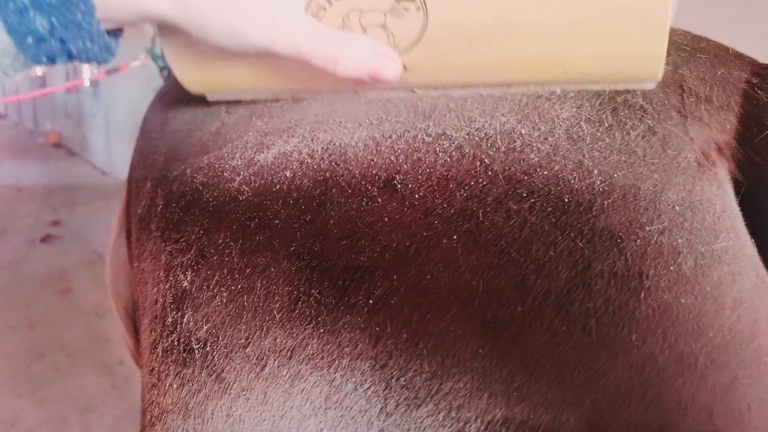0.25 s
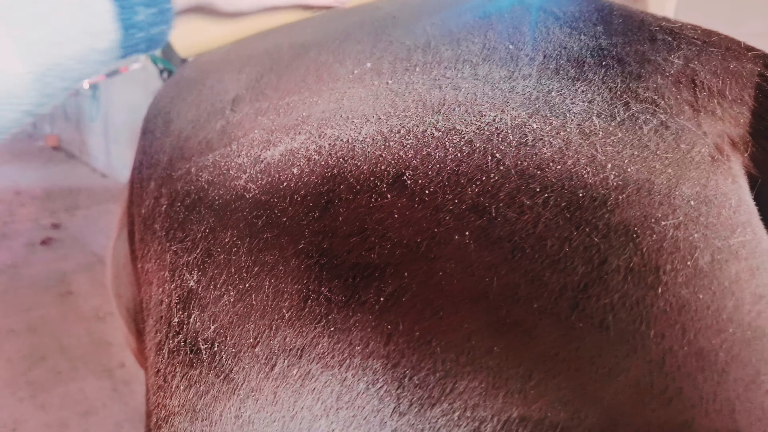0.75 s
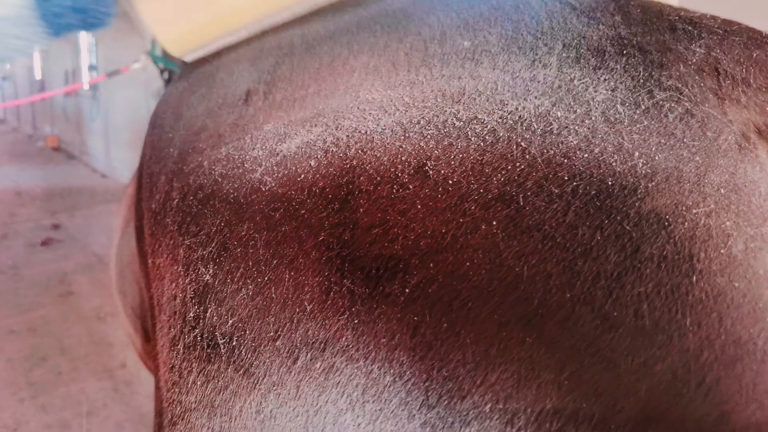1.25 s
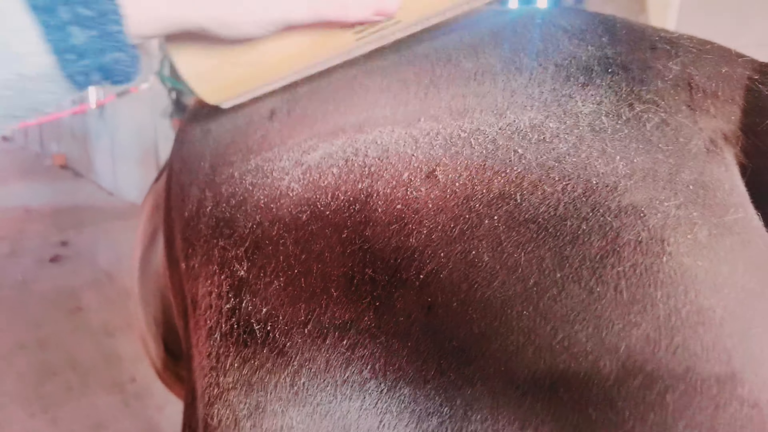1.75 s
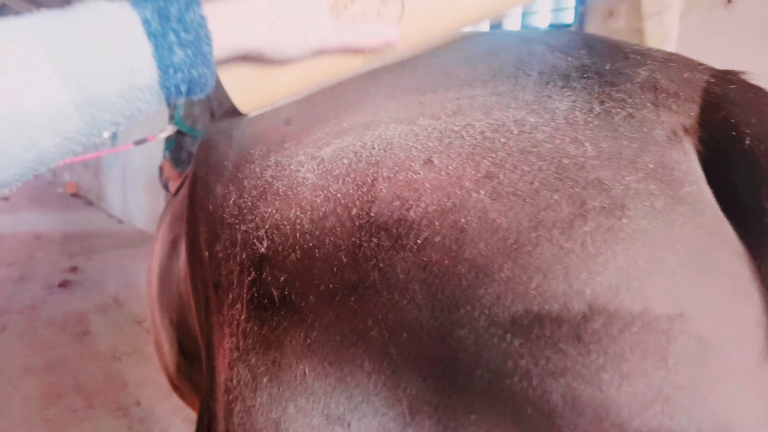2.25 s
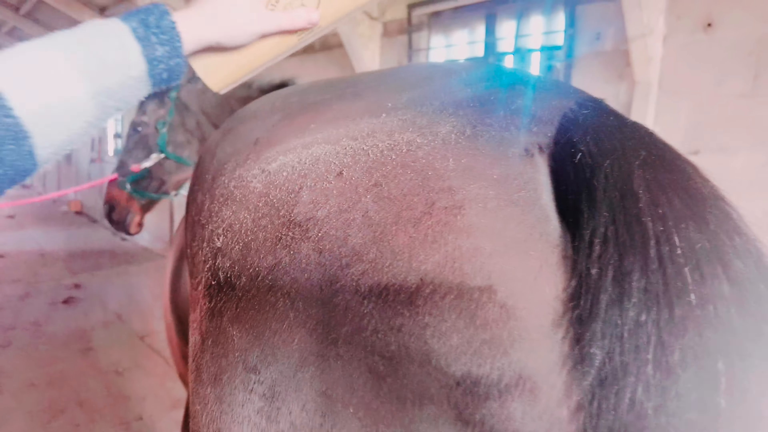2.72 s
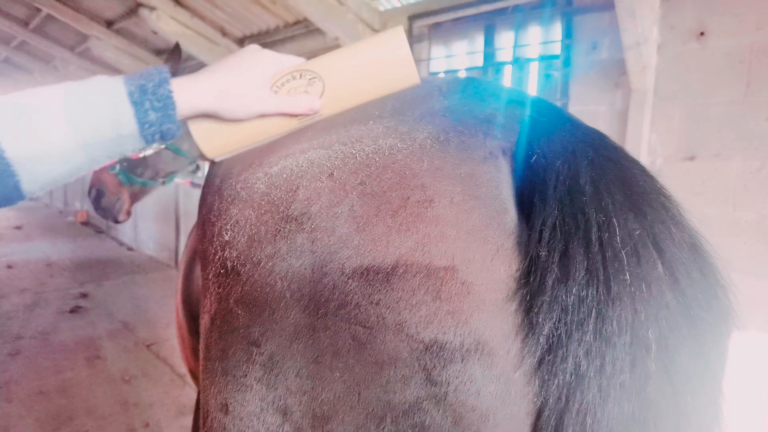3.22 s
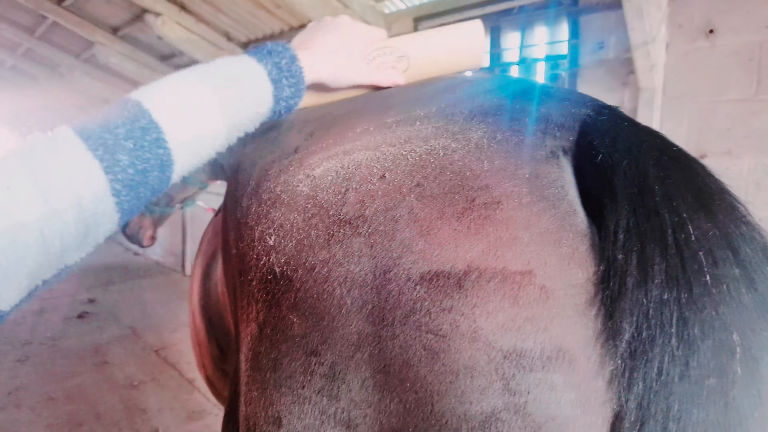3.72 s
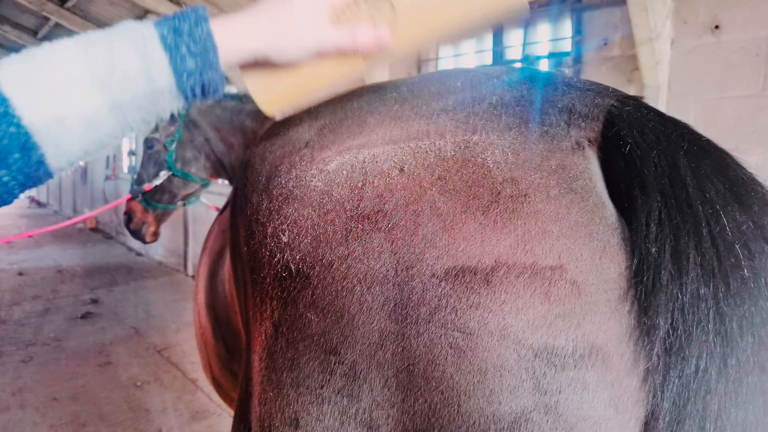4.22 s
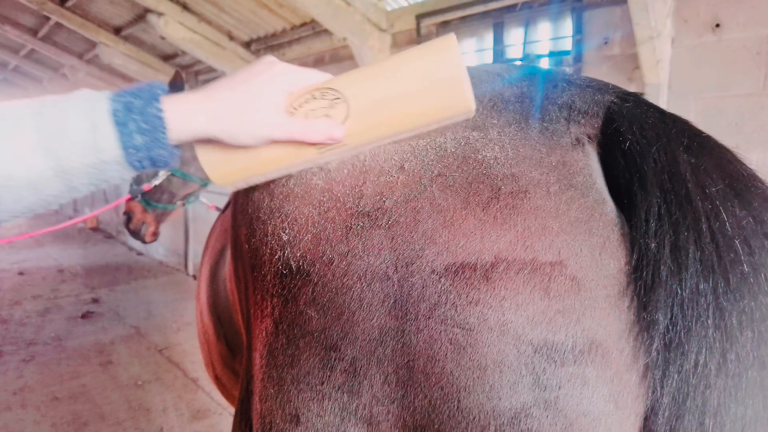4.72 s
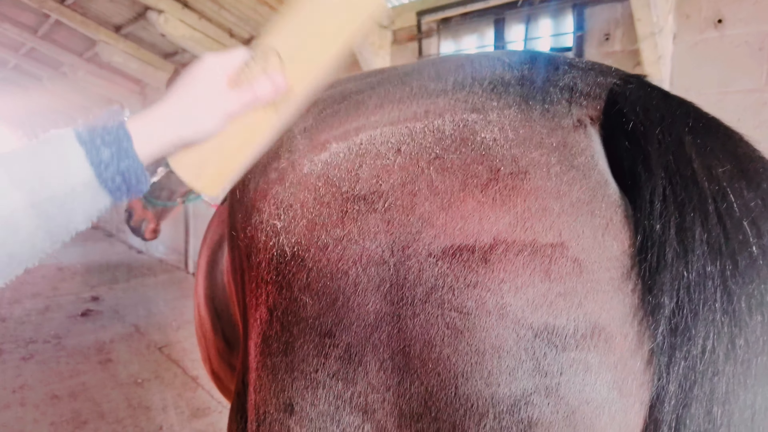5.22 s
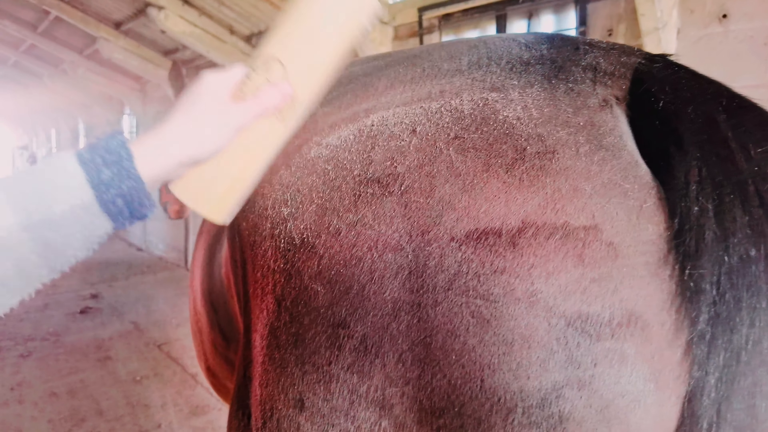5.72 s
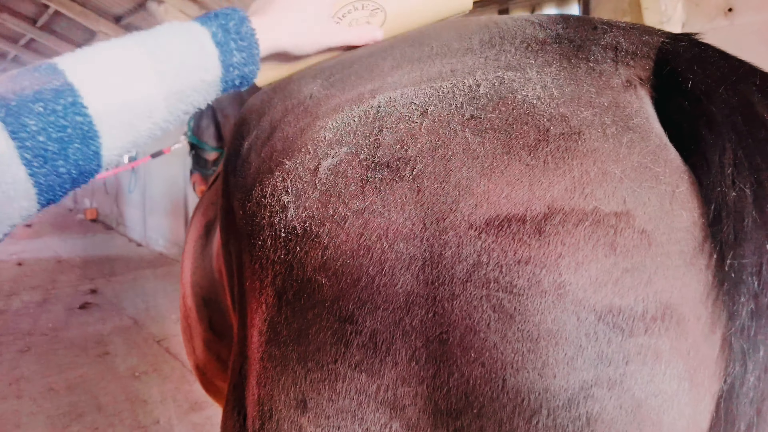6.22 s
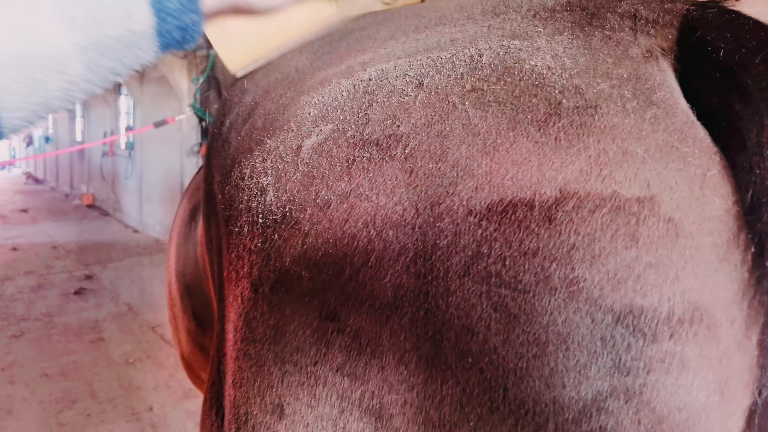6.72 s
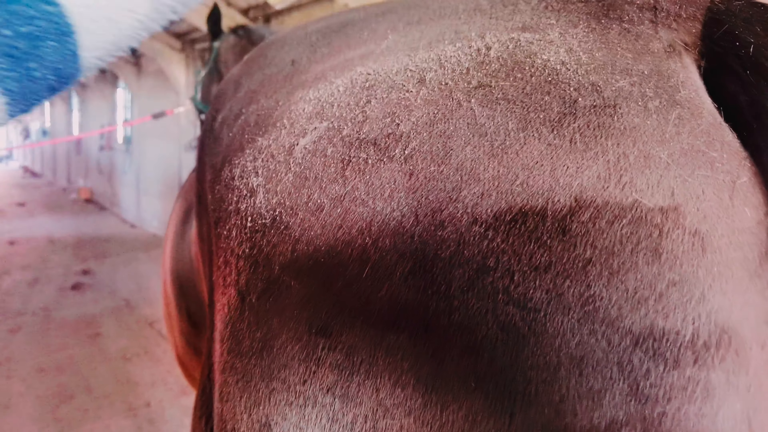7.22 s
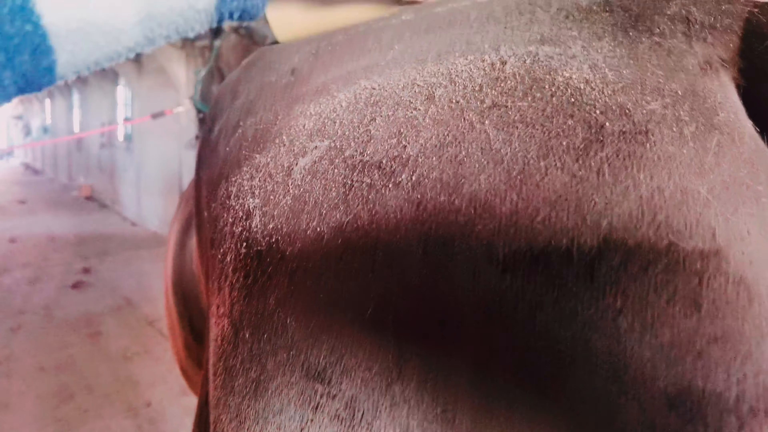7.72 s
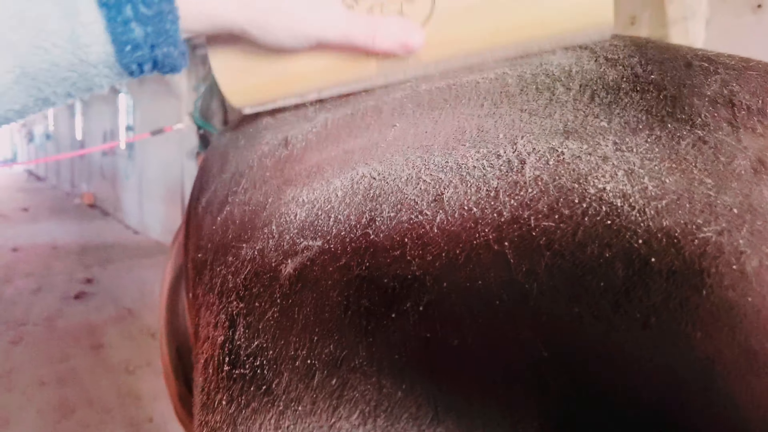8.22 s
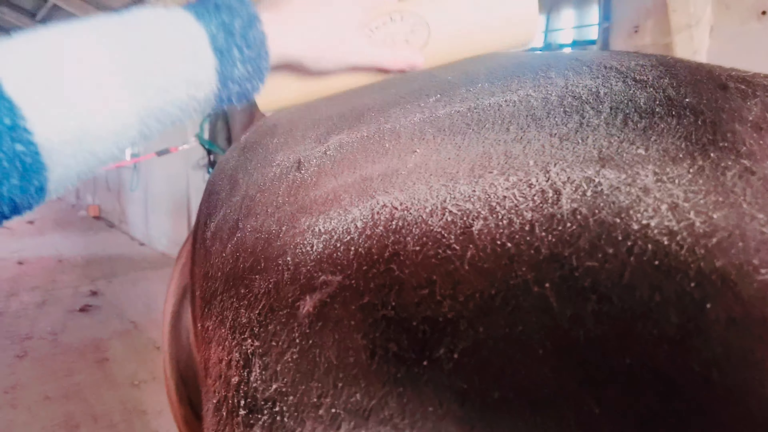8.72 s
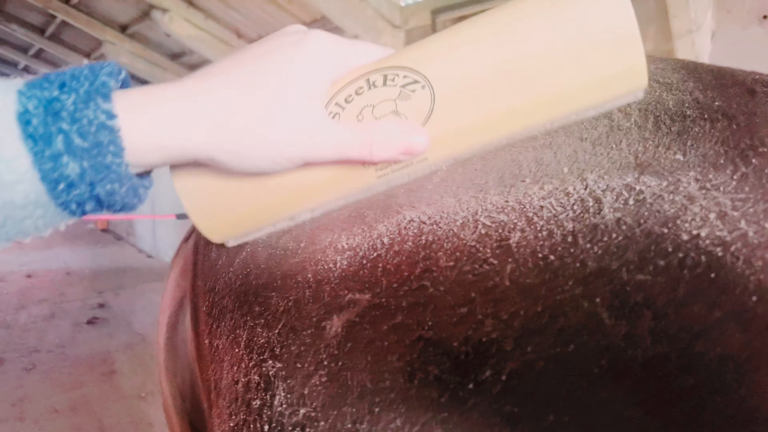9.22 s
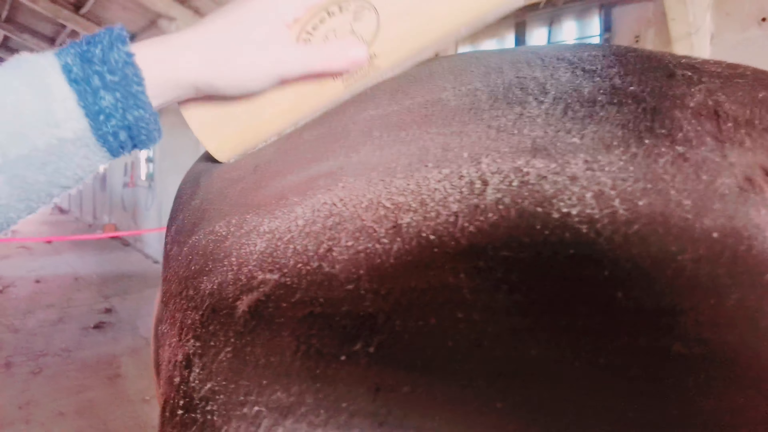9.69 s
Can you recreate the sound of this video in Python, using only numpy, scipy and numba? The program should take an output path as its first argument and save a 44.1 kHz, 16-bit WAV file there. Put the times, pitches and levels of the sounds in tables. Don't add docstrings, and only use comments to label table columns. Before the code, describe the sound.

Quick dry scrapes of a serrated grooming tool through short hair, bright and crackly, repeat unevenly over quiet wind rumble in a stable.

```python
import sys
import numpy as np
from scipy import signal
from scipy.fft import rfft, irfft, next_fast_len
from scipy.io import wavfile
from scipy.ndimage import uniform_filter1d
from numba import njit

SR = 44100
rng = np.random.default_rng(int(sys.argv[2]) if len(sys.argv) > 2 else 0)


def bounce(signal):
    frames = np.transpose(np.atleast_2d(signal))
    limited = np.clip(frames, -1, 1)
    pcm = np.round(limited * 32767).astype(np.int16)
    wavfile.write(sys.argv[1], SR, pcm)


def decibels_to_gain(level_db):
    exponent = np.asarray(level_db, float) / 20
    return 10 ** exponent


N = 438794
SIZE = next_fast_len(N)
HZ = np.arange(1, SIZE // 2 + 2) * SR / SIZE


def blade():
    # pitch_hz, level_db (per Hz)
    sum_colour = [(180, -53.5), (300, -31.5), (411, -23.5), (1420, -21), (1620, -17.5), (2150, -18.5),
                  (2490, -18.5), (3530, -10), (4520, -13), (5510, 1), (6720, -2.5), (8330, 6.5),
                  (11000, -14.5), (14400, -17), (15600, -21)]
    side_colour = [(180, -65), (300, -36.5), (675, -36), (850, -33), (987, -31.5), (2220, -18),
                   (2530, -15.5), (3710, -14), (4990, -6), (6190, -0.5), (7180, -12), (8400, -5),
                   (10200, -9.5), (11600, -23), (13000, -12), (15600, -28.5)]
    edges_hz = 1250, 2650, 4550, 6700, 10600
    delay_share = 0.05, -0.62, 0.33, .6, .3, .2
    drag, block, steel, fizz, block_hz, touch, coarse_db, thud_db = strokes()
    coarse_db = coarse_db - 5 * (1 - touch)
    tick, knock = ticks()
    hair = drag + tick
    fine = hair / np.sqrt(1 + decibels_to_gain(coarse_db) ** 2)
    coarse = fine * decibels_to_gain(coarse_db)
    hide = drag * decibels_to_gain(thud_db) + block * decibels_to_gain(-28) + 0.2 * knock
    gains = hide, block + knock, steel + 0.17 * knock, coarse, fine, fizz + tick * decibels_to_gain(-13)
    mid, loose = rfft(snaps(), SIZE)
    limits = (1, *edges_hz, SR)
    out = 0
    for lo, hi, gain, lag in zip(limits, limits[1:], gains, delay_share):
        side = (-1j * lag * mid + np.sqrt(1 - lag ** 2) * loose) * decibels_to_gain(0.5)
        part = irfft([mid * shape(sum_colour, lo, hi), side * shape(side_colour, lo, hi)], SIZE)[:, :N]
        if lo == edges_hz[0]:
            part = np.array([wood(p, block_hz, touch) for p in part])
        out = out + gain * unit(part)
    return out


def strokes():
    # land_s, speeding_up_s, slowing_until_lift_s, fastest_db, fade_by_lift_db
    stroke_table = [(-0.2, 0.097, 0.11, -29, 3.5), (0.299, 0.1, 0.068, -24.5, 5),
                    (0.765, 0.057, 0.081, -24, 8), (1.373, 0.19, 0.074, -22, 9.5),
                    (1.907, 0.11, 0.08, -23.5, 8), (2.592, 0.23, 0.11, -24, 10.5),
                    (3.23, 0.13, 0.1, -25.5, 9), (3.783, 0.065, 0.067, -23.5, 9.5),
                    (4.198, 0.025, 0.12, -28, 5), (4.88, 0.13, 0.18, -28.5, 6.5),
                    (5.652, 0.18, 0.15, -24.5, 10), (6.395, 0.12, 0.087, -28.5, 9.5),
                    (6.874, 0.053, 0.059, -34, 5.1), (7.316, 0.057, 0.052, -30.5, 11.5),
                    (7.656, 0.031, 0.045, -40.5, 11.5), (8.13, 0.23, 0.087, -26.5, 3),
                    (8.735, 0.04, 0.097, -23.5, 5.5), (9.324, 0.095, 0.035, -22, 7),
                    (9.691, 0.036, 0.056, -22.5, 9)]
    # softer_at_landing_db, block_share_db, blade_share_db, fizz_share_db,
    # coarse_over_fine_hair_db
    grip_table = [(6.0, -22, -19.5, -20, 0), (4.5, -23.5, -15, -17, 2.8), (5.5, -22.5, -13, -17, 0.7),
                  (5.5, -24, -10, -18.8, -3.5), (9.5, -19.5, -8.5, -16, -1.7), (10, -25, -15, -17, -1),
                  (18.5, -18.5, -12, -15, -4), (18, -20, -13.5, -17.5, -5.5),
                  (7.5, -18.5, -11, -16.5, -2.3), (7, -22.5, -15.5, -20, -2), (6, -18, -7, -17.5, -6),
                  (9, -18.5, -14, -17, -4), (8, -18, -17, -16, -7), (6, -25.5, -18.5, -19, -2),
                  (1.5, -24, -16, -15, -8), (18.5, -24, -13.5, -20.5, -1), (11.7, -21.5, -13.5, -17, -1),
                  (2.5, -22, -12.5, -19.5, -1), (5.5, -19.5, -10, -16.5, -3.5)]
    # landing_speed, lifting_speed (1 = usual), presses_harder_by_end_db
    hand_table = [(1.01, 0.95, 1.5), (1.01, 0.99, 2.5), (1, 1.3, 0), (1.3, 1.01, 2), (1, 1.1, -4),
                  (1.06, 1.01, 1.2), (1.4, 0.99, 0.5), (0.79, 1.1, -1.5), (1.1, 1.12, -2), (1, 0.99, 2),
                  (1.01, 0.86, -0.2), (.9, 0.71, 0.5), (0.67, 1.01, 3.5), (0.7, 0.8, 3), (1.2, 0.82, 4),
                  (1.1, 1.07, -1), (1.2, 1.02, -1), (1.28, 1, 3), (0.98, 1.05, -1)]
    # ring_at_landing_hz, hide_thud_db
    seat_table = [(2000, -28.5), (1996, -26.5), (2020, -27), (2150, -29), (2170, -29), (1980, -27),
                  (1870, -30.5), (2060, -37), (1990, -28.5), (2003, -28.5), (2065, -30.5), (1980, -28),
                  (1710, -33), (1746, -30.5), (1706, -29), (1890, -26.5), (1900, -28), (2050, -35.5),
                  (2150, -30)]
    # middle_s, length_s, hair_db, block_share_db
    brush_table = [(0.553, 0.095, -46, -7.5), (0.711, 0.017, -51.5, -18), (1.282, 0.033, -63, -9),
                   (1.837, 0.043, -60.5, -21.3), (2.512, 0.13, -63.5, -9), (3.193, 0.12, -56.2, -3.5),
                   (3.723, 0.27, -55.5, -13), (4.143, 0.015, -54, -28), (4.577, 0.19, -59, -3),
                   (4.762, 0.15, -62.5, -8), (5.572, 0.069, -54.7, -26), (6.354, 0.18, -57.5, -14),
                   (7.052, 0.056, -44, -16), (7.273, 0.038, -42, -28), (7.508, 0.18, -68, -2.5),
                   (8.098, 0.039, -57, -24), (9.212, 0.39, -63.5, -5), (9.839, 0.034, -36.5, -16.3)]
    # share_of_swell, rise_db, catch_at_lift_db, attack_db_per_s,
    # release_db_per_s, settling_hair_db, settling_db_per_s, share_in_brush_db
    layer_table = [
        (1.103, -0.5, 1, 531.5, 334, -8, 147, -1.5),
        (0.52, 1.46, 7.5, 515.0, 414.5, -15, 97, -2),
        (1.28, 2.5, -1.5, 659.5, 370.5, -7.5, 106.5, -22.5),
        (0.85, 0.6, 1.5, 572.5, 302.5, -31.5, 201, -20),
    ]
    t = np.arange(0, N / SR, 0.002)
    land, speeding, slowing, crest_db, fade_db = np.transpose(stroke_table)[..., None]
    soft_db, block_db, blade_db, fizz_db, coarse_db = np.transpose(grip_table)[..., None]
    landing, lifting, press_db = np.transpose(hand_table)[..., None]
    ring_hz, thud_db = np.transpose(seat_table)[..., None]
    at, length, brush_db, brush_block_db = np.transpose(brush_table)[..., None]

    fastest = land + speeding
    lift = fastest + slowing
    on = np.clip(t, land, lift)
    along = (on - land) / (lift - land)
    before = landing * np.maximum(land - t, 0)
    after = lifting * np.maximum(t - lift, 0)
    speed_up = -soft_db * ((fastest - on) / (fastest - land)) ** 2
    slow_down = -fade_db * ((on - fastest) / (lift - fastest)) ** 2
    swell = np.where(on < fastest, speed_up, slow_down)
    brush = decibels_to_gain(brush_db) * np.exp(-(2 * (t - at) / length) ** 2)
    blade_db = blade_db + press_db * (2 * along - 1)

    out = []
    shares = zip(layer_table, (0, block_db, blade_db, fizz_db), (0, brush_block_db, 0, 0))
    for layer, share, brush_share in shares:
        follow, rise, catch, attack, release, settle_db, settle, brushed = layer
        held_db = crest_db + share + follow * swell + rise * along + catch * along ** 5
        held = decibels_to_gain(held_db - attack * before)
        power = held ** 2 * (decibels_to_gain(-release * after) ** 2 + decibels_to_gain(settle_db - settle * after) ** 2)
        brush_power = (brush * decibels_to_gain(brushed + brush_share)) ** 2
        out.append(np.sqrt(power.sum(axis=0) + np.sum(brush_power, axis=0)))

    total, rest = power.sum(axis=0), decibels_to_gain(-63.5) ** 2
    sagging_hz = ring_hz - 151 * along
    out.append((np.sum(power * sagging_hz, axis=0) + rest * 2050) / (total + rest))
    out.append(total / (total + rest))
    out += [np.sum(power * db, axis=0) / total for db in (coarse_db, thud_db)]
    return curves(np.transpose([t, *out]))


def snaps():
    size = decibels_to_gain(1.5 * np.minimum(rng.exponential(size=N), 4))
    stutter = decibels_to_gain(0.5 * walk(120) + 0.31 * walk(50))
    return patchy(noise(2, N) * size * stutter, tuft_db=3.0, sweep_db=1.15)


def patchy(x, tuft_db, sweep_db):
    z = signal.stft(x, nperseg=256)[2]
    tufts = tuft_db * patches(z.shape, size=(2, 10))
    sweeps = sweep_db * patches(z.shape, size=(6, 20))
    return signal.istft(z * decibels_to_gain(tufts + sweeps), nperseg=256)[1][..., :N]


def patches(form, size):
    smooth = uniform_filter1d(noise(*form), size[0], axis=1)
    return unit(uniform_filter1d(smooth, size[1], axis=2))


def wood(x, block_hz, touch):
    pressed = 0.3 * x + ring(x, block_hz, 400.0)
    clear = 0.35 * x + 1.04 * ring(x, block_hz, 170.0)
    return touch * pressed + (1 - touch) * clear


@njit
def ring(x, hz, width):
    y, band, low = np.empty(len(x)), 0., 0.
    for i in range(len(x)):
        g, k = np.tan(np.pi * hz[i] / SR), width / hz[i]
        v = (band + g * (x[i] - low)) / (1 + g * (g + k))
        band, low, y[i] = 2 * v - band, low + 2 * g * v, k * v
    return y


def ticks():
    # start_s, peak_db, block_knock_share_db
    tick_table = [(0.2358, -25, -25), (0.541, -6.5, -13), (0.583, -24, 4), (0.708, -39, -27),
                  (1.828, -28, -21), (3.991, -6, -1), (4.142, -22, -29), (5.5347, -33.5, -29),
                  (6.3002, -28, -26), (7.2573, -17, -38), (7.637, -40, -33), (8.6717, -35, -26),
                  (9.8504, -20, -1)]
    out = np.zeros((2, N))
    s = np.arange(SR // 10) / SR
    burst = (1 - np.exp(-s / 0.006)) * np.exp(-s / 0.0038)
    for at, db, knock_db in tick_table:
        i = int(at * SR)
        peaks = decibels_to_gain([[db - 13.5], [db + knock_db - 20.5]])
        out[:, i:i + len(s)] += (peaks * burst)[:, :N - i]
    return out


def stall(x):
    s = np.arange(SR // 2) / SR
    echo = noise(2, len(s)) * np.exp(-np.log(1000) * s / 0.071) * (s > 0.008)
    echo = echo / np.sqrt(np.sum(echo[0] ** 2))
    return decibels_to_gain(-15) * signal.fftconvolve(x[None], echo, axes=1)[:, :N]


def wind():
    # time_s, rumble_db, flutter_share_db
    wind_table = [(0.0, -62, -1.5), (1.41, -56.5, -7.5), (2.35, -60.5, 0.5), (2.46, -54.5, -5),
                  (3.55, -58, 1.5), (4.29, -48, -10), (4.49, -58, -1.5), (5.9, -53.5, -5), (5.99, -45.5, 1),
                  (6.29, -51, -6.5), (6.51, -45, -9), (7.01, -42.5, -13), (7.4, -53.5, -3),
                  (7.54, -46.5, -13.5), (8.01, -56, -0.5), (8.42, -43, -13.5), (8.76, -52, -5),
                  (9.95, -55, 1)]
    # pitch_hz, level_db (per Hz)
    gust_colour = [(12, -45.5), (20, -29.5), (43, -2), (68, 1.5), (90, -1.5), (320, -18.5), (352, -21.5),
                   (558, -33.5), (614, -34.5), (900, -44.5), (1170, -67.5), (1980, -120)]
    # middle_s, length_s, level_db
    bump_table = [(.42, 0.092, -60), (0.604, 0.061, -51.5), (1.53, 0.15, -52.5), (2.008, 0.12, -59),
                  (3.91, 0.51, -63), (4.154, 0.055, -68), (7.55, 0.1, -60.5), (9.2, 0.12, -63),
                  (2.739, 0.12, -62), (6.048, 0.081, -57)]
    rumble_db, flutter_db = curves(wind_table)
    air = noise(2, N) * decibels_to_gain([[0], [-12]])
    rumble = unit(colour(air, gust_colour, hi_hz=132.0)) * decibels_to_gain(rumble_db + 0.65 * walk(5.8))
    t = np.arange(0, N / SR, 1 / 200)
    bumps = sum(decibels_to_gain(db) * np.exp(-(2 * (t - at) / length) ** 2) for at, length, db in bump_table)
    bumps, = curves(np.transpose([t, bumps]))
    gain = decibels_to_gain(rumble_db + flutter_db + 2.0 * walk(8)) + bumps
    flutter = unit(colour(air, gust_colour, lo_hz=139.0)) * gain
    return rumble + flutter


def bird():
    # time_s, pitch_hz
    song = [(4.65, 13440), (4.68, 11500), (4.72, 10600), (4.735, 11400), (4.765, 11300), (4.785, 10200)]
    hz, = curves(song)
    s = np.arange(N) / SR
    singing = (s > song[0][0]) * (s < song[-1][0])
    tone = np.sin(2 * np.pi * np.cumsum(hz + 120 * walk(400)) / SR) * singing
    return decibels_to_gain(-76 + 3.0 * walk(60)) * np.array([tone, 0.3 * tone])


def stable():
    # pitch_hz, level_db (per Hz)
    hiss_colour = [(290, -36.5), (500, -0.5), (1100, -9.5), (1520, -7.5), (1900, -11.5), (2090, -5),
                   (2300, -9), (3810, -14.5), (4660, -12), (8170, 3), (9850, -10), (12100, -29),
                   (14100, -33), (15600, -37)]
    air = noise(2, N) * decibels_to_gain([[0], [-4]])
    return unit(colour(air, hiss_colour)) * decibels_to_gain(-67.5 + 1.7 * walk(4.2))


def ports(mid, side):
    # pitch_hz, left_minus_right_db
    shading = [(60, 0.5), (110, 0.5), (200, -0.5), (380, 1.5), (700, 1.5), (1290, -0.5), (2380, -3),
               (4400, 3.5), (8120, -1), (15000, 9)]
    hz, db = np.transpose(shading)
    left = colour(mid + side, np.transpose([hz, db / 2]))
    right = colour(mid - side, np.transpose([hz, -db / 2]))
    return np.array([left, right])


def noise(*shape):
    return rng.standard_normal(shape)


def walk(rate):
    k = int(SR / rate)
    steps = np.repeat(noise(N // k + 1), k)
    return unit(uniform_filter1d(uniform_filter1d(steps, k), k)[:N])


def curves(rows):
    s, *columns = np.transpose(rows)
    return [np.interp(np.arange(N) / SR, s, c) for c in columns]


def unit(x):
    return x / np.sqrt(np.mean(np.atleast_2d(x)[0] ** 2))


def shape(points, lo_hz=1., hi_hz=SR):
    at, db = np.transpose(points)
    edge = np.sqrt(1 / (1 + (lo_hz / HZ) ** 24) / (1 + (HZ / hi_hz) ** 24))
    return decibels_to_gain(np.interp(np.log(HZ), np.log(at), db)) * edge


def colour(x, *form, **edges):
    return irfft(rfft(x, SIZE) * shape(*form, **edges), SIZE)[..., :N]


def starve(x):
    # pitch_hz, share (0 to 1)
    loss = [(1800, .0), (2600, .05), (4000, .015), (6500, .015), (10500, .06), (15000, .1)]
    lead = 1024 - 438
    both = np.pad([x[0] + x[1], x[0] - x[1]], ((0, 0), (lead, 0))) / 2
    hz, _, z = signal.stft(both, SR, "cosine", 2048)
    band = np.where(hz < 6500, hz / 350, 9.3 + hz / 700).astype(int)
    at, share = np.transpose(loss)
    loud_odds = np.array([np.interp(hz, at, share), np.where(hz > 6900, 0.2, 0.02)])[..., None]
    quiet_odds = np.array([0 * hz, 0.85 * (hz > 6900)])[..., None]
    luck = rng.random((2, band.max() + 1, z.shape[2] // 2 + 1))
    luck = luck.repeat(2, axis=2)[:, band, :z.shape[2]]
    loud = np.sqrt(np.sum(np.abs(z[0]) ** 2, axis=0)) > decibels_to_gain(-48)
    lost = (~loud & (luck < quiet_odds)) | (loud & (luck < loud_odds))
    mid, side = signal.istft(z * ~lost, SR, "cosine", 2048)[1][:, lead:lead + N]
    return np.array([mid + side, mid - side])


def scene():
    rasp = blade()
    mid, side = rasp + stall(rasp[0]) + wind() + stable() + bird()
    return ports(mid, side)


def top_cut(x):
    return signal.sosfilt(signal.butter(12, 15770, fs=SR, output="sos"), x)


def record(dry):
    mix = starve(dry)
    return top_cut(mix)


dry = scene()
out = record(dry)
bounce(out)
```